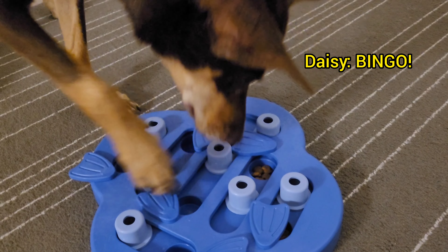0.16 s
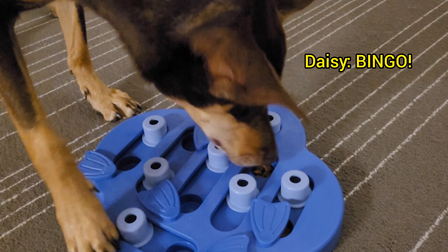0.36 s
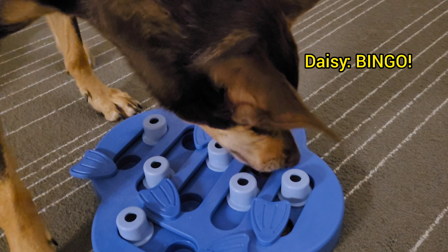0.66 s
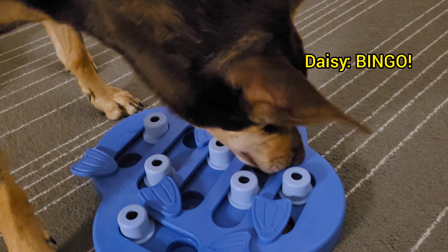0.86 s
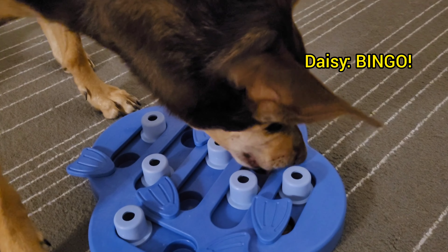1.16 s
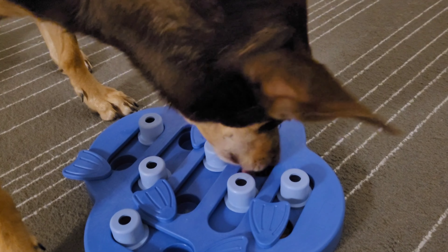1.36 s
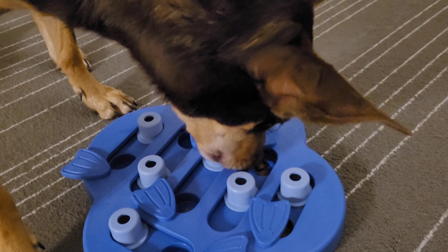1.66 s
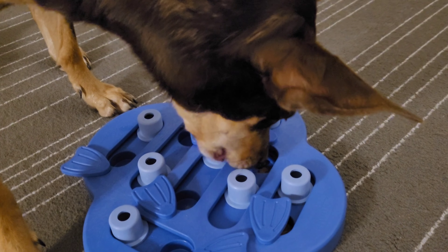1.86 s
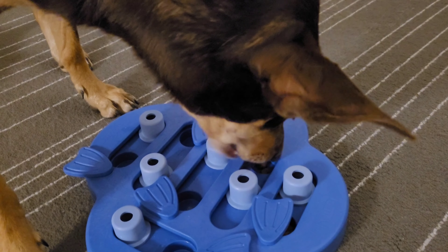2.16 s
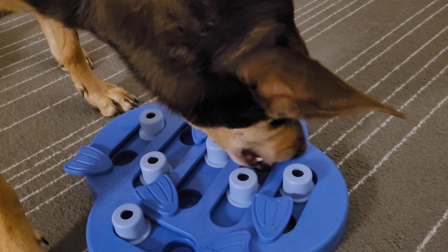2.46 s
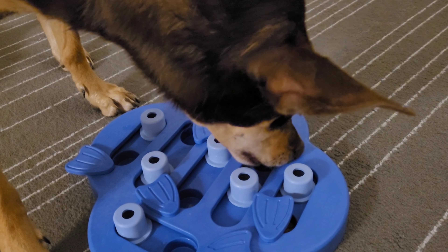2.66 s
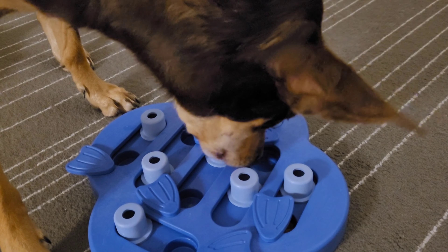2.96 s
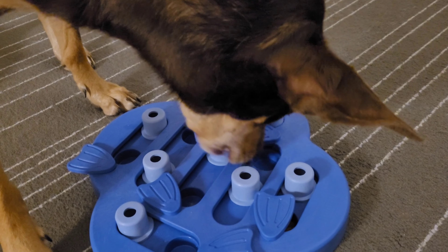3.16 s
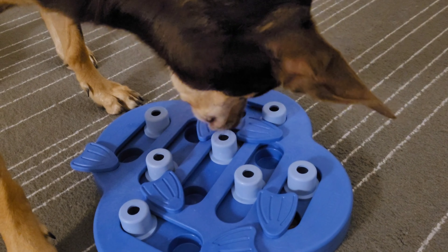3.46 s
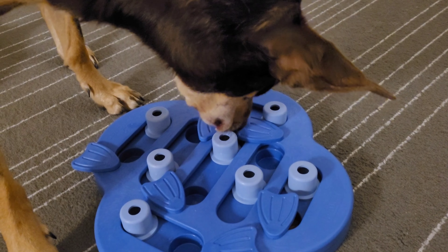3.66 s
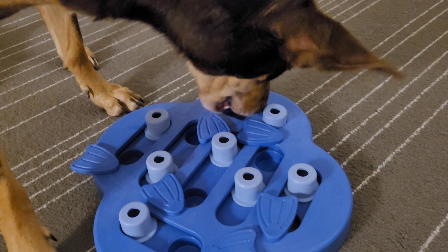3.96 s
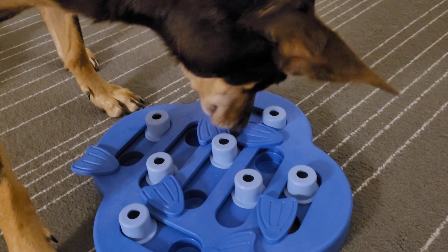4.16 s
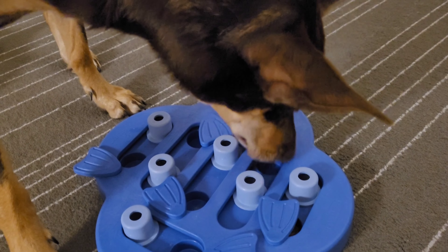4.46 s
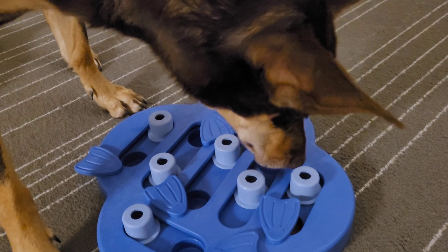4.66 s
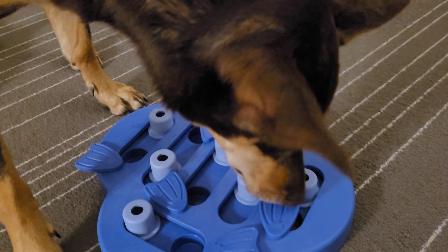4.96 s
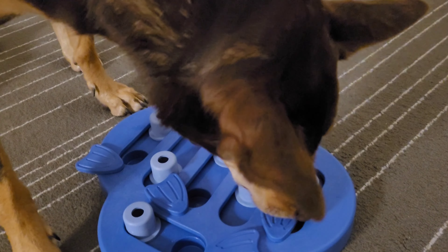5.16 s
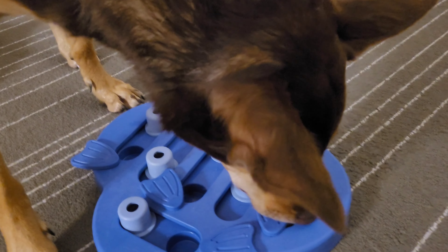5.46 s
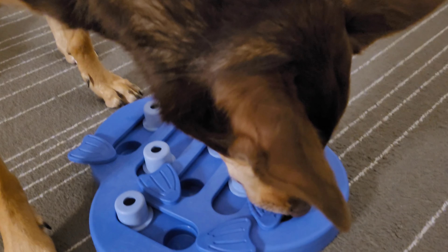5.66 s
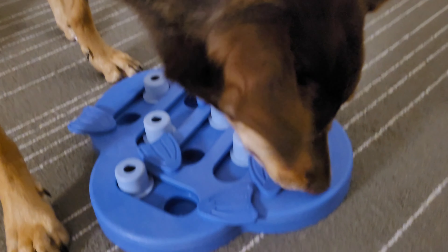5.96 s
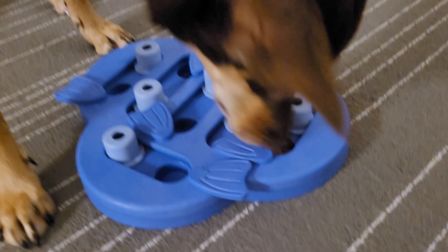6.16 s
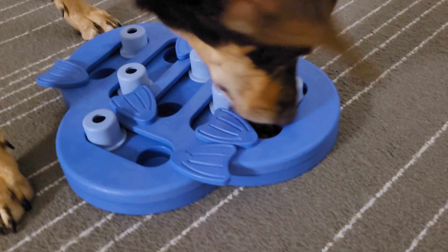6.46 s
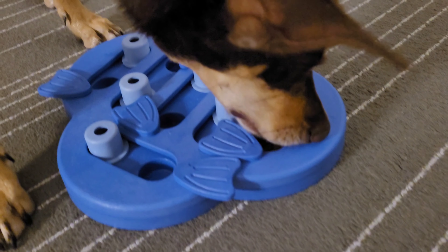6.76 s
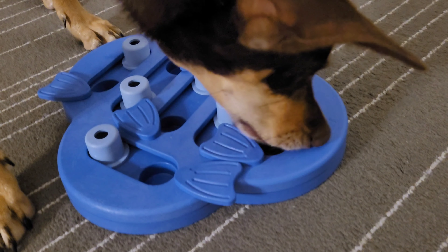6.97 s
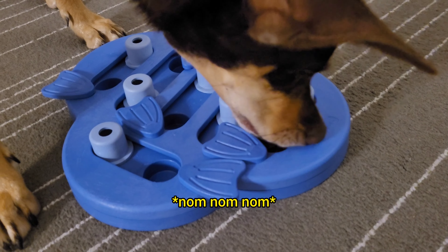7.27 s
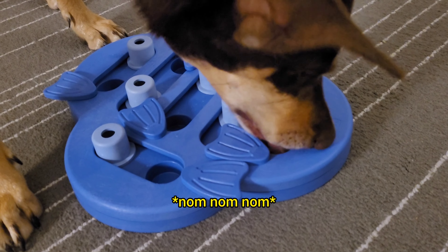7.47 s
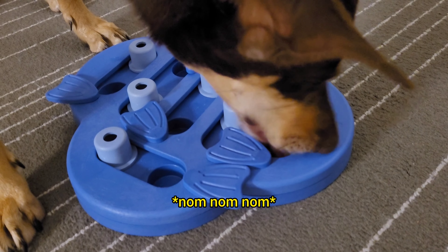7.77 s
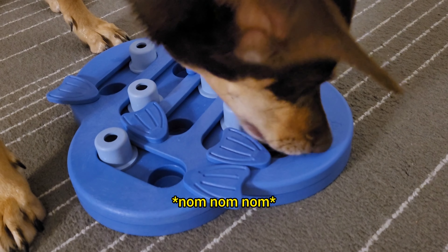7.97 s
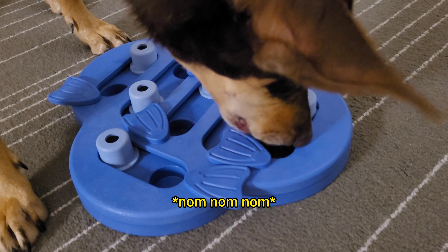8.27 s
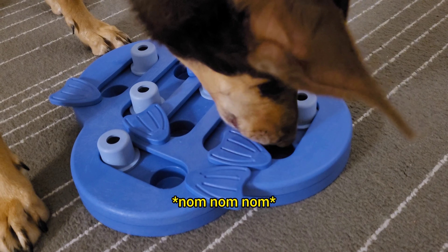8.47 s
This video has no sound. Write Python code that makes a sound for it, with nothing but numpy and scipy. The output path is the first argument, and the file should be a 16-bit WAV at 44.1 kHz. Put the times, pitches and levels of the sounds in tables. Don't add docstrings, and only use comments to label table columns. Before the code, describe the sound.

Close stereo pickup of a dog working a hollow plastic puzzle board on carpet. It opens with a scraping push and clatter, then scattered hollow knocks, sharp peg clicks and short rubs with small pauses. Later, dry pellets and flaps rattle quickly in an open well, then one loud clack and a scrape. Soft floor thuds, faint brushing, quiet house hum and a thin high whine lie beneath, in a furnished room.

```python
import sys
import numpy as np
from scipy import signal
from scipy.fft import rfft, irfft, next_fast_len
from scipy.io import wavfile
from scipy.ndimage import map_coordinates

SR = 44100
rng = np.random.default_rng(int(sys.argv[2]) if len(sys.argv) > 2 else 0)


def to_wav(s):
    ch = np.atleast_2d(s).T
    pcm = np.round(np.clip(ch, -1, 1) * 32767)
    wavfile.write(sys.argv[1], SR, pcm.astype(np.int16))


def makeup_ratio(level_db):
    decades = np.asarray(level_db, float) / 20
    return 10 ** decades


N = 380121

# (centre [Hz], width [Hz], level [dB])
SHELL_MODES = [(280.4, 120, -16.5), (456, 96, -5), (624.6, 115, -3), (688.4, 106, -2), (800, 137, -3),
               (886, 300, -8)]
# (centre [Hz], width [Hz], level [dB])
FLAP_MODES = [(1067, 194, -4.5), (1349, 350, -6), (1613, 66, -1.5), (1916, 118, 1), (2074, 130, -2.5),
              (2450, 520, -7)]
# (frequency [Hz], level [dB])
CRACK_DB = [(1500, -30), (2700, -2.5), (3500, 3.5), (4500, 0), (6000, 0.5), (8500, -9), (12000, -21),
            (16000, -29)]


def unit(x):
    return x / np.sqrt(np.mean(x ** 2) + 1e-20)


def along(points, hz):
    f, v = np.transpose(points)
    return np.interp(np.log(hz + 1), np.log(f + 1), v)


def curves(rows):
    s, *cols = np.transpose(rows)
    return [np.interp(np.arange(N) / SR, s, c) for c in cols]


def wobble(rate):
    knots = rng.standard_normal(int(N * rate / SR) + 4)
    return map_coordinates(knots, [np.arange(N) * rate / SR])


def filtered(x, response):
    m = next_fast_len(x.shape[-1] + 8192)
    spectrum = rfft(x, m) * response(np.fft.rfftfreq(m, 1 / SR))
    return irfft(spectrum, m)[..., :x.shape[-1]]


def mode(f, hz, width):
    return 1j * f * width / (hz * hz - f * f + 1j * f * width)


def modes(f, table, scatter_db=0):
    scatter_db = np.zeros(len(table)) + scatter_db
    total = 0
    for k, (hz, width, db) in enumerate(table):
        total = total + (-1) ** k * makeup_ratio(db + scatter_db[..., k, None]) * mode(f, hz, width)
    return total


def diffuse(pair, response):
    # (frequency [Hz], left-right likeness [-1..1])
    likeness = [(60, 0.67), (250, 0.82), (700, 0.28), (2000, 0), (5000, 0)]

    def mid_side(hz):
        turn = np.arccos(np.clip(along(likeness, hz), -1, 1)) / 2
        return response(hz) * [np.cos(turn), np.sin(turn)]

    mid, side = np.moveaxis(filtered(pair, mid_side), -2, 0)
    return np.stack([mid + side, mid - side], axis=-2)


def house():
    # (frequency [Hz], density [dB per Hz])
    hush_db = [(20, -45.5), (55, -10.5), (250, -5.5), (3150, -23.5), (5000, -24), (8300, -17),
               (9000, -23.5), (16000, -22.5)]
    # (frequency [Hz], level [dB])
    floor_db = [(20, -26), (45, -13.5), (66, -14.5), (100, -3.5), (160, -6), (250, -4), (500, -9.5),
                (1200, -45.5)]
    # (middle [s], half length [s], level [dB])
    steps = [(0.08, 0.037, -61), (1.385, 0.0293, -68.5), (1.96, 0.073, -59), (2.5, 0.029, -84),
             (2.85, 0.051, -63.5), (3.195, .04, -76), (3.883, 0.073, -75.5), (4.743, 0.046, -73.5),
             (5.397, 0.15, -60), (6.13, 0.15, -70), (8.199, 0.064, -72), (8.347, 0.128, -57),
             (8.543, 0.135, -60)]
    # (centre [Hz], width [Hz], level [dB])
    whine_bands = [(3766, 200, -1), (8000, 220, -7.5)]
    # (time [s], level [dB])
    whine_swell = [(1.2, 1), (1.7, -0.7), (6.7, -0.3), (7.2, -5)]
    # (start [s], end [s], frequency [Hz], level [dB])
    tones = [(5.97, 6.28, 160, -63.5), (5.26, 6.75, 1300, -90.5), (7.2, 7.29, 790, -60)]
    t = np.arange(N) / SR

    def noise(response):
        return unit(diffuse(rng.standard_normal((2, N)), response))

    hush = makeup_ratio(-78 + 0.53 * wobble(13)) * noise(lambda f: makeup_ratio(along(hush_db, f)))
    weight = makeup_ratio(-81) + sum(makeup_ratio(db - 13 * ((t - s) / half_s) ** 2) for s, half_s, db in steps)
    thud = weight * makeup_ratio(1.7 * wobble(17)) * noise(lambda f: makeup_ratio(along(floor_db, f)))
    drone = makeup_ratio(-86.5 + 1.7 * wobble(2.5)) * noise(lambda f: mode(f, 66, 11.0) ** 2)
    flutter_db = 2.0 * wobble(49) + 1.7 * wobble(1.6)
    whine = makeup_ratio(-73.0 + curves(whine_swell)[0] + flutter_db) * noise(lambda f: modes(f, whine_bands) ** 2)
    hums = 0
    for start_s, end_s, hz, db in tones:
        swell = np.sin(np.pi * np.clip((t - start_s) / (end_s - start_s), 0, 1))
        hums = hums + makeup_ratio(db) * swell * np.sin(2 * np.pi * hz * t)
    return hush + (thud + drone) * makeup_ratio([[-1.5], [1.5]]) + whine + hums


def swishes():
    # (start [s], length [s], level [dB], centre [Hz], width [Hz])
    brushes = [(0.313, 0.061, -62, 12380, 6000), (0.466, 0.027, -64.5, 9600, 7000),
               (1.909, 0.021, -53, 11400, 6980), (1.958, 0.018, -55, 11600, 7000),
               (2.062, 0.011, -45, 9800, 12000), (2.071, .006, -51, 9000, 12000),
               (3.042, 0.023, -63, 11000, 6000), (3.965, 0.094, -68.5, 6870, 3120),
               (2.163, 0.087, -57, 1340, 1200), (5.24, 0.36, -67, 1500, 3500),
               (5.361, 0.045, -55, 479, 90.7), (5.903, 0.066, -65.5, 5900, 2250),
               (5.893, 0.079, -77, 2450, 604), (8.341, 0.006, -42, 10000, 5000)]
    longest_flick_s = 0.035
    out, send = np.zeros((2, N + SR))
    pulse = signal.unit_impulse(SR // 2, 64)
    for s, length_s, db, hz, width in brushes:
        u = np.linspace(0, 1, round(length_s * SR))
        colour = lambda f: mode(f, hz, width) ** 3
        grit = np.prod(rng.standard_normal((2, SR // 2)), axis=0)
        hiss = unit(filtered(grit, colour))[:len(u)]
        stroke = makeup_ratio(db) * np.sin(np.pi * u ** 0.55) ** 1.4 * hiss
        flick = filtered(pulse, colour)[:len(u)]
        flick = flick * np.linalg.norm(stroke) / np.linalg.norm(flick)
        at = round(s * SR)
        out[at:][:len(u)] += stroke
        send[at:][:len(u)] += stroke if length_s > longest_flick_s else flick
    return out[:N], send[:N]


def pushes():
    # (peak [s], level [dB], fade [s], hardness [dB])
    strokes = [(0, -39.5, 0.21, -18), (.55, -60, 0.32, 8.5), (.9, -71.5, 0.44, -13),
               (1.45, -58, 0.59, -1.5), (2.0, -60, 0.39, -1), (2.3, -70.5, 0.88, -12), (3.07, -74, 0.37, 2),
               (3.74, -59, 0.92, -9), (4.8, -54.5, 0.29, -5), (5.4, -59.5, 0.24, -1.5),
               (6.18, -53.5, .27, -4), (6.68, -61, 0.89, -3), (6.8, -62, .5, 9), (7.15, -66, 0.53, 17),
               (7.4, -61, .15, 5), (7.65, -60.5, 0.27, 2), (7.9, -59, 0.42, 2), (8.2, -38, 0.15, 3.5)]
    fade_db, rise_share = 22.5, 0.6
    rest_db, rest_hardness_db = -76.5, -11.5
    t = np.arange(0, N / SR + .01, .002)
    s, db, fade_s, hard_db = np.transpose(strokes)[:, :, None]
    level_db = db - fade_db * np.maximum(t - s, (s - t) / rise_share) / fade_s
    level_db = np.vstack([level_db, rest_db + 0 * t])
    hard_db = np.vstack([hard_db, [rest_hardness_db]])
    offsets_db = 0, hard_db, -18.5 + 0.73 * hard_db
    return [np.interp(np.arange(N) / SR, t, makeup_ratio(level_db + off).max(axis=0)) for off in offsets_db]


def slips(rate, spread_db):
    size = makeup_ratio(spread_db * np.clip(rng.exponential(size=N), 0, 2))
    slipping = rng.random(N) < rate / SR
    return unit((slipping * size + 0.1) * rng.standard_normal(N))


def sliding():
    rumble, rub, scrape = pushes()
    jerk_db = 4.7 * wobble(45)
    shell = unit(filtered(slips(450, 2.7), lambda f: modes(f, SHELL_MODES)))
    flaps = unit(filtered(slips(660, 4.2), lambda f: modes(f, FLAP_MODES) * mode(f, 1100, 2500)))
    rasp = unit(filtered(slips(2100, 8.7), lambda f: makeup_ratio(along(CRACK_DB, f))))
    low = rumble * makeup_ratio(-6.5 + jerk_db) * shell
    upper = rub * makeup_ratio(-8.5 + jerk_db) * flaps
    return low + upper + scrape * makeup_ratio(-5.0 + jerk_db) * rasp


def contacts():
    # (time [s], peak [dB], hardness [dB], chatter [ms])
    rim = [(.0222, -28, -5, 2.4), (.1641, -35.5, -34, 3.7), (1.4409, -24, -27, 2.03),
           (2.4941, -42, -38, 8.7), (4.699, -43.5, -20, 19), (4.7628, -23, -22.5, 1.8),
           (5.1958, -53.5, -28.5, 8.9), (6.452, -44.5, -12, 17), (6.4763, -36, -18, 10.4),
           (6.505, -32.5, -19, 20)]
    shell = [(.0156, -24.5, -14, 5.2), (.5472, -43, -9, 3.8), (.6133, -40, -21, 7.2),
             (.6245, -32, -35.5, 3.6), (.647, -40, -47, 3.2), (.9444, -23.5, -15, 2.16),
             (1.4565, -21.5, -13.5, 1.83), (1.87, -39, -7, 1.3), (1.8927, -40, 1.5, 3.9),
             (2.9228, -35, -13, 5.2), (3.0482, -34.5, -6.5, 4.2), (3.1914, -21, -15.5, 8.9),
             (3.5941, -40.5, -43, 6.3), (3.6475, -31, -33, 1.37), (4.4997, -34.5, -7, 1.98),
             (8.5838, -46.5, -3, 2.9)]
    padded = [(2.502, -33.5, -20, 5.9), (2.723, -48, -9, 12.5), (3.1016, -40.5, -36, 2.25),
              (3.548, -46.5, -38, 2), (3.5679, -46, -54, 1.5), (3.855, -34, -22.5, 6.5),
              (4.097, -29, -46, 1.8), (8.3404, -24.5, -5, 5), (8.4732, -22, -8, 1.2)]
    cup = [(.936, -32, -21, 5.5), (1.3686, -17, -9, 5.07), (2.8033, -62, 13, 12), (3.2977, -25, -9.5, 1.73),
           (3.8269, -30, -36, 1.7), (3.8652, -20, -23.5, 4.84), (4.3543, -50.5, -20.5, 6.1),
           (6.1043, -27, -10.5, 9.8)]
    slot = [(.1439, -36.5, -9.5, 3.7), (2.2397, -44.5, -21, 5.7), (2.2537, -38, -15.5, 1.53),
            (7.2254, -44, 2, 3), (7.2507, -38, 0, 1.65), (7.5465, -45, -12, 1.7), (7.8666, -39.5, 4, 2.5)]
    peg = [(.13, -39, -12, 21.4), (.6653, -30, -13.5, 1.2), (.6827, -28.5, -3, 1.62),
           (.756, -40.5, -21, 1.6), (.7934, -32.5, -1.5, 1.07), (.8173, -28, -2, 1.53),
           (.833, -43.5, 0, 14), (1.0568, -38, -9.5, 5.8), (1.0661, -17.5, 0, 6.45),
           (1.9183, -27.5, -5.5, 6.7), (2.1641, -40, -9, 1.6), (2.3887, -38.5, -9, 11),
           (2.476, -41.5, -9.5, 13.3), (2.816, -15.5, -13.5, 4.36), (2.8712, -18.5, -37, 1.09),
           (4.7139, -22, -18, 1.51), (4.7302, -29.5, -20, 17), (4.7707, -28, -17, 7.4),
           (6.0943, -26, -7.5, 3.04), (6.4894, -32.5, -19, 1.2), (6.4979, -30, -19, 2.52),
           (6.6922, -49, 0, 2.2), (7.1011, -31.5, 1.5, 3.3), (8.1855, -24, -11.5, 28.7)]
    hinge = [(.3625, -40, -15, 5), (.5112, -46, -7, 1.7), (.778, -39, 2, 1.4), (6.7421, -51, -27, 3.8),
             (6.7749, -35, 0.5, 9.8), (6.812, -31.5, 4.5, 17), (7.08, -32, -4, 2.2),
             (7.3134, -29, -6.5, 1.15), (7.698, -38, -4, 13), (8.1272, -42, -4, 3.3),
             (8.156, -8, -12.5, 6.3)]
    flap = [(.3224, -33, -6.5, 3.2), (1.7384, -60.5, 2, 2.3), (1.9623, -27.5, -6.5, 9.2),
            (2.0648, -51.5, 4.5, 8.6), (2.4126, -33, -0.5, 1.1), (4.7492, -22, -20, 6.5),
            (6.723, -30.5, -0.5, 2.16), (6.9145, -32.5, -9.5, 9.9), (6.9263, -36, 3.5, 7.5),
            (6.9519, -35, 0.5, 14.5), (7.0855, -26, 0, 6.5), (7.2763, -41.5, 7, 2.36),
            (7.2999, -34, -2.5, 0.93), (7.3563, -36, -6, 12), (7.3683, -30, -2, 9.2),
            (7.5162, -45, 3.5, 4.4), (7.5873, -35.5, -14, 3.1)]
    tip = [(.3016, -31, 3, 5.4), (1.5227, -36.5, -11, 5.4), (1.7895, -52.5, -.5, 1.3),
           (1.8157, -45.5, -2.5, 2.43), (6.7866, -37, 1, 2.35), (6.8283, -28, -2, 2.7),
           (6.9872, -35.5, 6, 2.4), (7.0145, -37, -11.5, 8.2), (7.0551, -37, -7.5, 4.5),
           (7.5722, -33.5, 9, 2), (7.6207, -24.5, 4.5, 1.48), (7.6699, -35, -1, 3.26),
           (7.7149, -25, 1.5, 2.07), (7.9122, -26.5, -3.5, 1.41), (8.0516, -56.5, 1, 6.8),
           (8.083, -35.5, -8, 2.3), (8.092, -35, 7, 3.3)]
    # (contacts, pitch Hz, share of the flap modes dB)
    parts = [(rim, 478, 1.6), (shell, 675, -2.2), (padded, 740, -7.5), (cup, 725, -1.5), (slot, 886, -2.7),
             (peg, 1310, -1.38), (hinge, 1804, -1.64), (flap, 1955, -0.42), (tip, 2244, 0.36)]
    rows = np.array([(*row, hz, share_db) for table, hz, share_db in parts for row in table])
    return rows[np.argsort(rows[:, 0])]


def match_energy(shape, like):
    norm = lambda x: np.linalg.norm(x, axis=1, keepdims=True)
    return shape * norm(like) / norm(shape)


def knocks(count):
    # (frequency [Hz], level [dB])
    kibble_db = [(1500, -22.5), (2700, 4.5), (3500, -0.5), (5400, -2.5), (6100, -0.5), (6900, -5.5),
                 (9500, -17.5), (16000, -30)]
    well_open_s = 6.6
    size, lead_in = 4096, 700
    s, db, hard_db, chatter_ms, part_hz, share_db = contacts().T[:, :, None]
    chatter_s = chatter_ms / 1000
    f = np.fft.rfftfreq(size, 1 / SR)
    t = (np.arange(size) - lead_in) / SR
    before = t < 0
    draw = rng.random((len(s), 24))
    grit = rng.standard_normal((4, len(s), size))

    bounce = np.arange(6) > 0
    hit_s = lead_in / SR + chatter_s * (np.arange(6) + draw[:, :6]) / 6 * bounce
    force = makeup_ratio((-2.5 - 11.1 * draw[:, 6:12]) * bounce) * (-1) ** np.arange(6)
    blow = np.exp(-2j * np.pi * f * lead_in / SR)
    blows = rfft(makeup_ratio(-37.5 + 1750 * t * before) * before * grit[0])
    for k in range(6):
        blows = blows + force[:, [k]] * np.exp(-2j * np.pi * f * hit_s[:, [k]])

    upper = np.clip(makeup_ratio(share_db + 0.082 * hard_db), .03, .97)
    shell = np.sqrt(1 - upper ** 2) * modes(f, SHELL_MODES, 7 * draw[:, 12:18] - 5)
    flaps = 0.56 * upper * modes(f, FLAP_MODES, 7 * draw[:, 18:] - 5)
    part = 1.16 * mode(f, part_hz, 60 + 0.048 * part_hz) * np.where(part_hz > 1000, 1.294 * upper, 1)
    body = mode(f, 790, 3100) * mode(f, 520, 4500)
    body = body / (1 + 1j * f / (9000 * makeup_ratio(0.38 * hard_db))) ** 2
    ring = irfft(blows * body * (shell + flaps + part), size)
    ring /= np.abs(ring).max(axis=1, keepdims=True)

    since_bounce_s = np.clip(t - chatter_s, 0, 1)
    skid_rise = makeup_ratio(-38.0 + 3000 * t * before)
    fade = np.where(before, skid_rise, makeup_ratio(-60 * since_bounce_s / 0.011 - 580 * t))
    colour = makeup_ratio(np.where(s < well_open_s, along(CRACK_DB, f), along(kibble_db, f)))
    sides = (grit[1] + 1.1 * grit[2:]) * np.abs(grit[0])
    crack = irfft(rfft(sides * fade) * colour, size)
    crack *= makeup_ratio(hard_db + 3.0) / np.abs(crack).max(axis=(0, 2), keepdims=True)

    send = match_energy(irfft(blow * body * (shell + flaps + 0.5 * part), size), ring)
    send += makeup_ratio(-0.5) * match_energy(irfft(blow * colour, size), crack[0])
    near = np.zeros((2, N + 2 * size))
    tracks = np.zeros((count, N + 2 * size))
    for k, at in enumerate(np.round(s[:, 0] * SR).astype(int)):
        near[:, at:at + size] += makeup_ratio(db[k]) * (ring[k] + crack[:, k])
        tracks[k % count, at:at + size] += makeup_ratio(db[k]) * send[k]
    return near[:, lead_in:lead_in + N], tracks[:, lead_in:lead_in + N]


def room(tracks):
    # (frequency [Hz], t60 [s])
    t60_s = [(150, 0.82), (400, 0.23), (1000, 0.48), (2800, 0.35), (7300, 0.46), (14000, 0.42)]
    hz, t, z = signal.stft(rng.standard_normal((len(tracks), 2, SR // 2)), SR, nperseg=256)
    decay = makeup_ratio(-60 * t / along(t60_s, hz)[:, None])
    tail = signal.istft(z * decay, SR, nperseg=256)[1]
    onset = np.clip(np.arange(tail.shape[-1]) / SR / 0.003, 0, 1)
    tail = diffuse(tail * onset, np.ones_like)
    tail /= np.sqrt(np.sum(tail ** 2, axis=(1, 2), keepdims=True) / 2)
    return signal.fftconvolve(tracks[:, None], tail, axes=2).sum(axis=0)[:, :N]


def scene():
    # (time [s], left-right [dB])
    place = [(0.0, 1.5), (7.63, 0), (8.62, 7.5)]
    # (frequency [Hz], left-right [dB])
    shading_db = [(200, -4.5), (500, -1), (1500, -6.5), (4000, 2.5), (8000, 4), (13000, 13.5)]
    # (frequency [Hz], phase [radians])
    lead_rad = [(100, .05), (700, 0.76), (2000, 0.92), (3100, 2.22), (4050, 3.74), (6100, 4.74),
                (8000, 6.5), (13000, 15)]
    near, tracks = knocks(count=4)
    rub = sliding()
    brush, brush_send = swishes()
    tracks[0] += makeup_ratio(0.5) * (rub + brush_send)
    sides = np.array([[.5], [-.5]])

    def ports(f):
        return makeup_ratio(sides * along(shading_db, f)) * np.exp(1j * sides * along(lead_rad, f))

    direct = (near + rub + brush) * makeup_ratio(sides * curves(place)[0])
    return filtered(direct, ports) + makeup_ratio(-3.5) * room(tracks) + house()


def band_limit(x):
    return signal.sosfilt(signal.butter(12, 16680, fs=SR, output="sos"), x)


def record(dry):
    top_hz = 15800
    mix = filtered(dry, lambda hz: hz < top_hz)
    return band_limit(mix)


dry = scene()
out = record(dry)
to_wav(out)
```